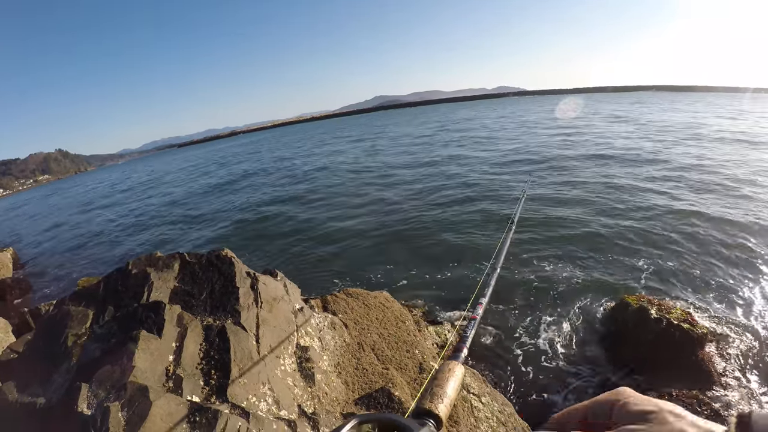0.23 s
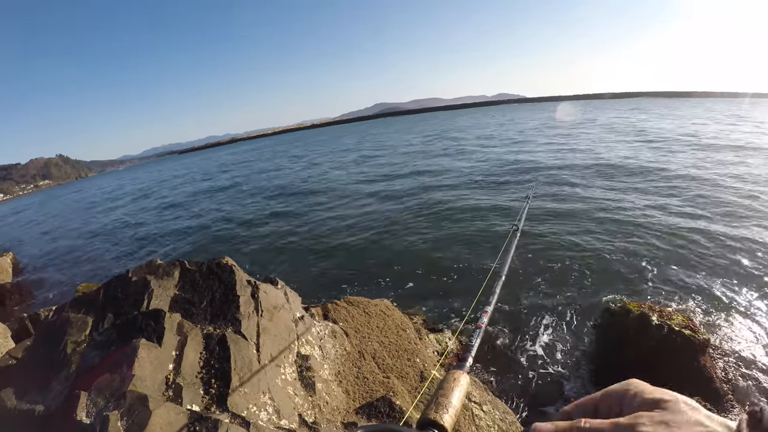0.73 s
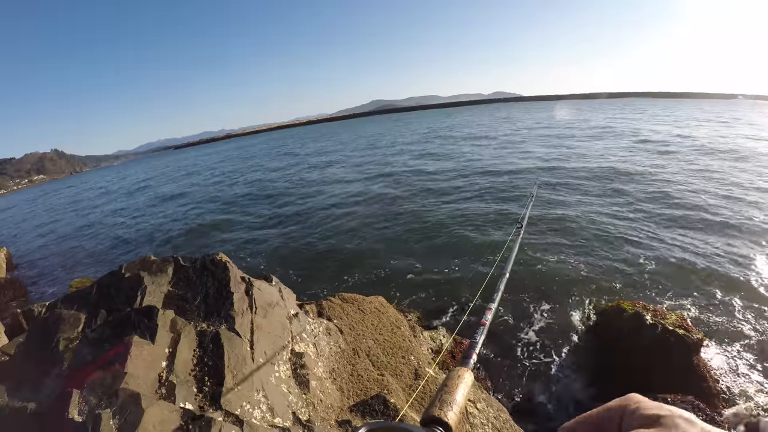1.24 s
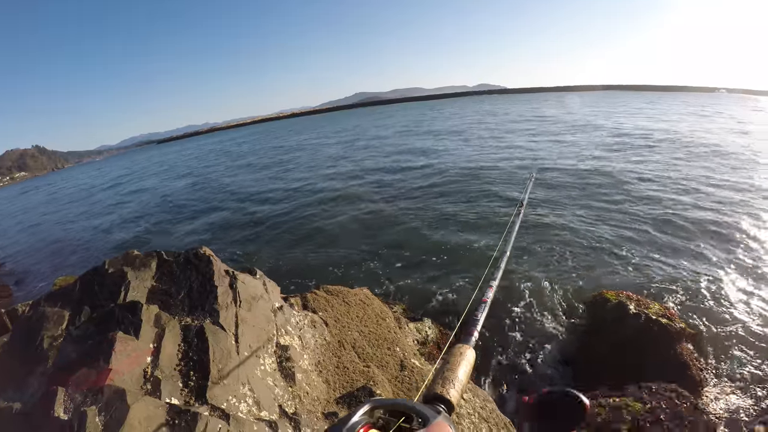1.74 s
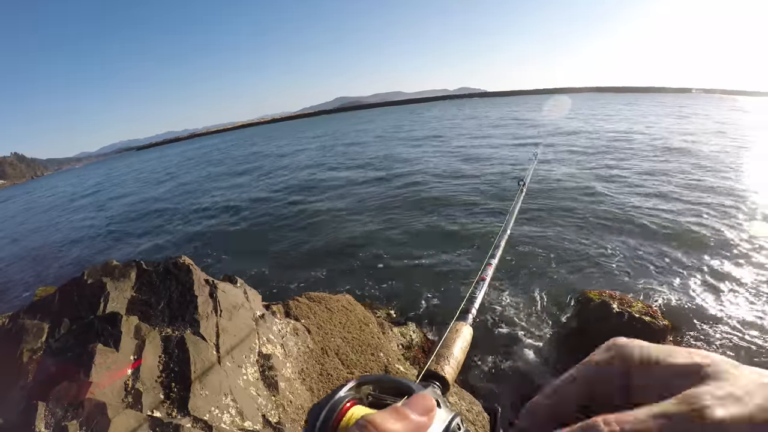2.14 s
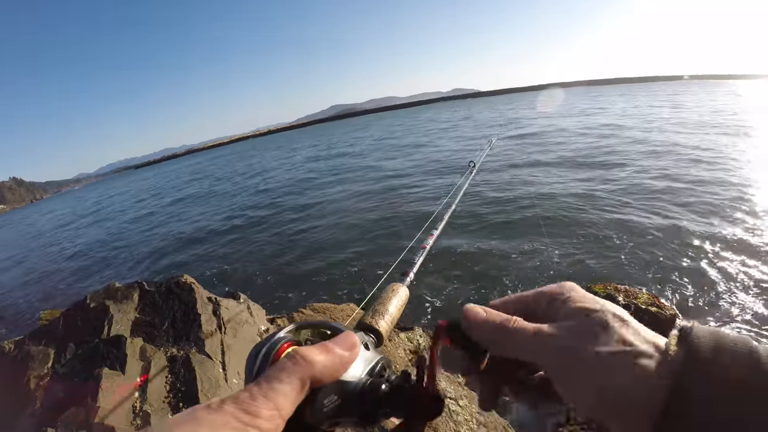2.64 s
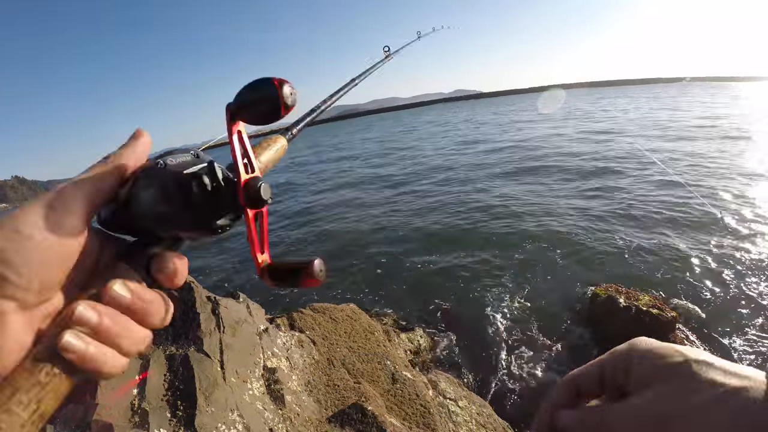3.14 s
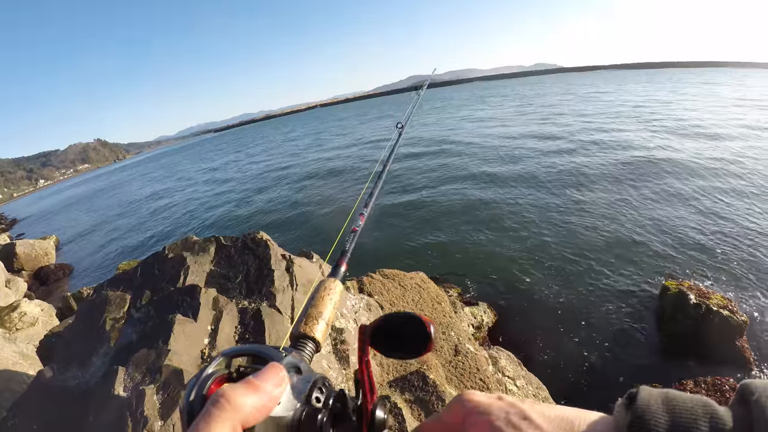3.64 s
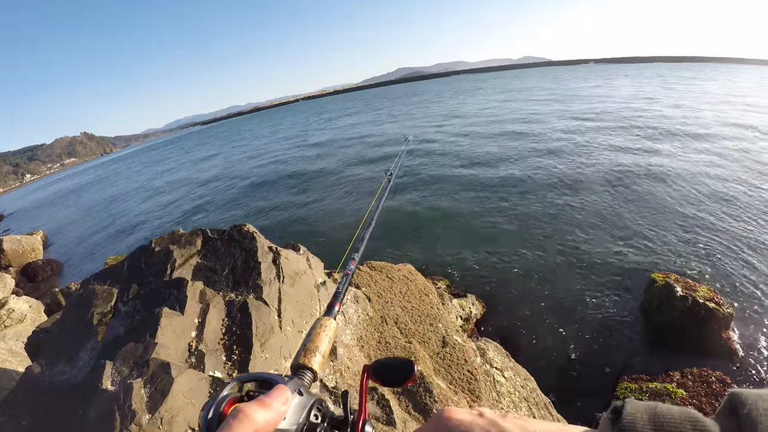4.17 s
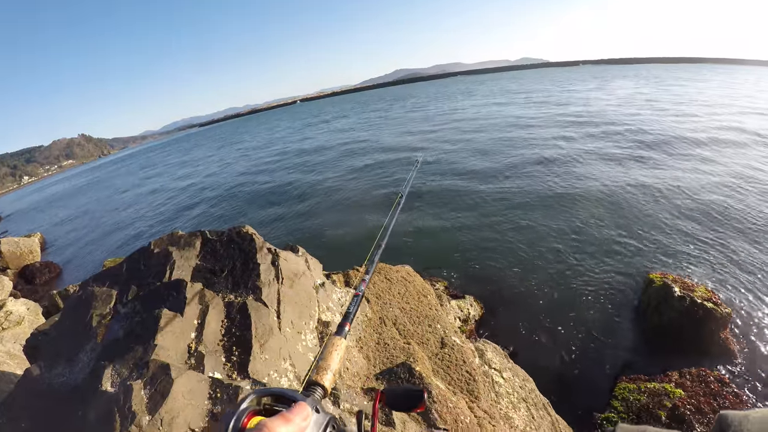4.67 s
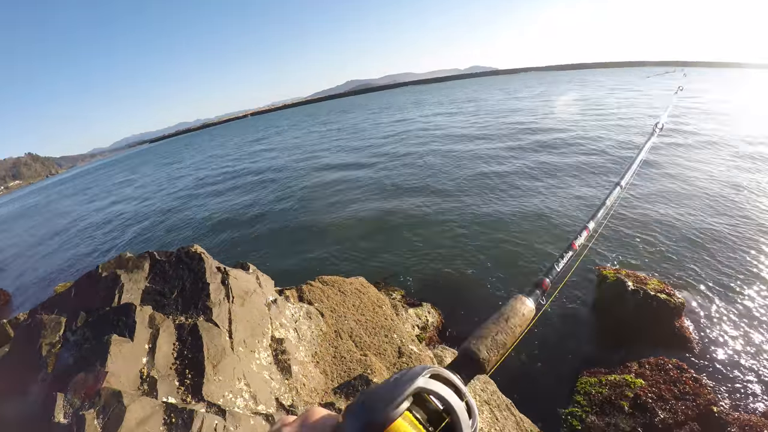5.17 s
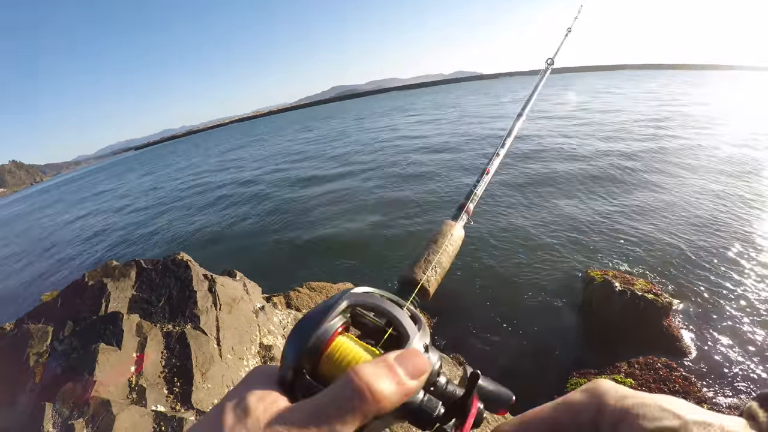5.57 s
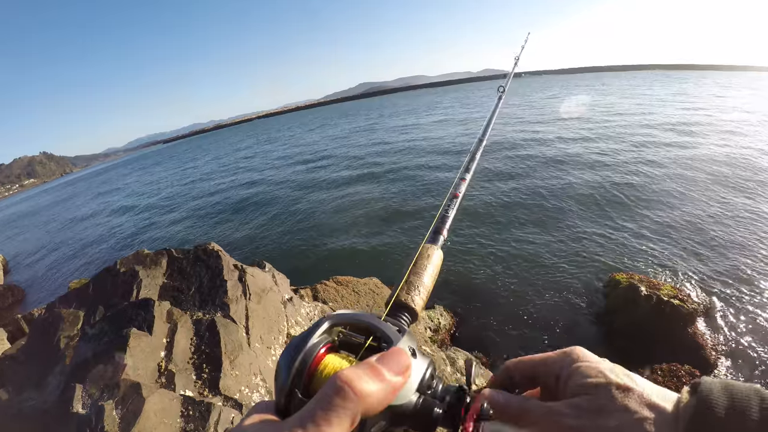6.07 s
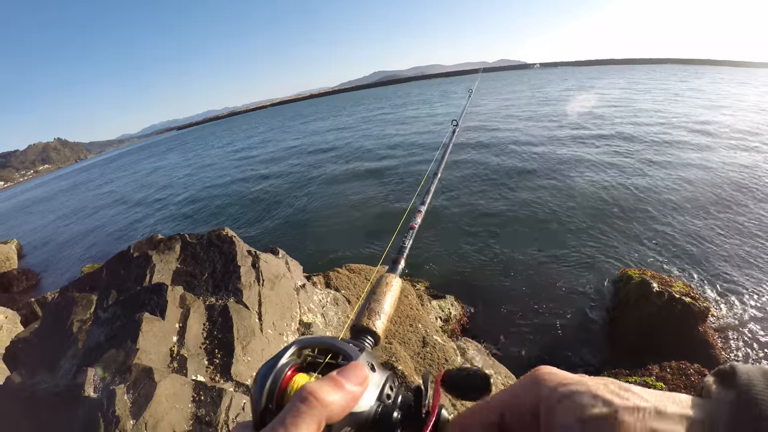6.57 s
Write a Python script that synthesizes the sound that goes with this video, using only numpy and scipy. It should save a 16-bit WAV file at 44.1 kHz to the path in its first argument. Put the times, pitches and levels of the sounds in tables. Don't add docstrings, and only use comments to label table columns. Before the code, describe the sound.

Outdoors on a rocky jetty, small waves surge, slap and fizz close below, with plopping bubbles and hollow knocks in wide stereo. One reel tick comes early. Just after three seconds the sound abruptly drops, quieter, dull and centred. Soft wash continues with faint line and reel ticks, clustered around five seconds; then the width returns as low wind thumps buffet the chest-worn microphone.

```python
import sys
import numpy as np
from scipy import signal
from scipy.fft import rfft, irfft, next_fast_len
from scipy.io import wavfile
from scipy.ndimage import uniform_filter1d, map_coordinates

SR = 44100
rng = np.random.default_rng(int(sys.argv[2]) if len(sys.argv) > 2 else 0)


def elevation(decibels):
    levels = np.asarray(decibels, float)
    return 10 ** (levels / 20)


def put_to_file(sound):
    columns = np.atleast_2d(sound).T
    safe = np.clip(columns, -1, 1)
    whole_steps = np.round(safe * 32767)
    wavfile.write(sys.argv[1], SR, whole_steps.astype(np.int16))


N = 300321
SWITCH_S = 3.262


def evened(x):
    return x / np.sqrt(np.mean(x ** 2) + 1e-20)


def read(points, hz):
    f, *values = np.transpose(points)
    return [np.interp(np.log(hz + 1), np.log(f + 1), v) for v in values]


def curves(rows):
    s, *values = np.transpose(rows)
    return [np.interp(np.arange(N) / SR, s, v) for v in values]


def add(mix, s, sound, pan_db):
    part = mix[:, round(s * SR):][:, :len(sound)]
    part += elevation([[pan_db / 2], [-pan_db / 2]]) * sound[:part.shape[1]]


def band(x, lo_hz, hi_hz):
    return signal.sosfilt(signal.butter(2, [lo_hz, hi_hz], "bandpass", fs=SR, output="sos"), x)


def swells(rows, rise_s):
    t = np.arange(0, N / SR + .01, .002)
    s, _, length_s = np.transpose(rows)[:3, :, None]
    rise = np.exp(-((t - s) / rise_s) ** 2)
    fall = np.exp(-abs(t - s) / np.maximum(length_s, .005))
    return t, np.where(t < s, rise, fall)


# (time [s], share [0-1])
WIDE = [
    (0, 0.92),
    (3.257, 0.9),
    (3.267, 0),
    (5.55, 0.01),
    (6.4, 0.66),
    (6.6, 0.7),
    (6.81, 0.77),
]


def wide_share():
    return np.clip(curves(WIDE)[0], 0, 1)


def foam(patchy_db=1.5, flicker_db=0.74):
    frames = N // 128 + 5
    patches, flicker = rng.standard_normal((frames, 257, 2)).T
    patches = uniform_filter1d(patches, size=6, axis=0)
    patches = evened(uniform_filter1d(patches, size=20, axis=1))
    flicker = uniform_filter1d(flicker, size=60, axis=0)
    flicker = evened(uniform_filter1d(flicker, size=4, axis=1))
    re, im = rng.standard_normal((frames, 257, 2, 2)).T
    z = (re + 1j * im) * elevation(patchy_db * patches + flicker_db * flicker)
    return evened(signal.istft(z, nperseg=512, noverlap=384)[1][:, :N])


def grains(per_cycle=.25, spread_db=3.5, turns=4.8, rise=0.12, count=30):
    out = np.zeros((2, N))
    for hz in np.geomspace(130, 11000, count):
        u = np.arange(int(3 * turns / hz * SR)) / SR * hz / turns
        tone = np.sin(2 * np.pi * turns * (u + rise * u * u / 2))
        ring = tone * np.exp(-2 * u) * (1 - np.exp(-8 * u))
        luck = rng.random((2, N)) / (per_cycle * hz / SR)
        train = (luck < 1) * np.clip(luck, .007, 1) ** (-spread_db * np.log(10) / 20)
        out += signal.oaconvolve(train - train.mean(), ring[None] / np.linalg.norm(ring), axes=1)[:, :N]
    return evened(out)


# (time [s], wash level [dB], foam brightness [dB])
SEA = [
    [(0.0, -29.5, -19), (0.01, -30.5, -15), (0.15, -34.5, -10.5), (0.25, -30.5, -15), (0.99, -35, -10),
     (1.88, -34, -5.5), (2.08, -31.5, -3.5), (3.13, -27, -10.5), (3.26, -29.5, -12.5)],
    [(3.27, -50, -35), (3.27, -48, -12.5), (4.74, -50, -11.5), (4.83, -49, -12.5), (4.88, -50.5, -11.5),
     (5.06, -49.5, -10), (5.66, -46.5, -10.5), (6.5, -47.5, -8.5), (6.81, -41.5, -12.5)],
]
# (share of wash [0-1], share of foam [0-1], share of slap [0-1],
# level on the pair [dB], level on the sheltered port [dB])
LAYERS = [
    (0.68, 0.021, 0.83, -6.5, -5),
    (1.0, 0.11, 0.45, -1.5, 0.5),
    (1.0, 0.98, 0.86, -1.5, -2.5),
    (0.66, 0.43, 0.12, -29.5, -28.5),
]
WAKE_DB = [-2, 0, 0, -17]
# (time [s], lift [dB], length [s], reach into the treble [0-1])
SLAPS = [(0.0, 3, 0.1, 0.6), (0.205, 2, .03, 0.2), (0.257, 5.5, 0.12, 0.43), (0.451, 4.5, 0.047, 0.43),
         (0.538, 8, 0.02, 0.28), (0.79, 3.5, 0.55, 0.11), (6.728, 2.5, 0.065, 0.9), (1.5, 0.5, 0.19, 0.6),
         (1.385, 1, 0.058, 0.9), (2.867, 2, 0.055, 0), (6.454, 0.5, 0.04, 0.2), (6.0, -0.5, .2, 0.3),
         (3.05, 0.5, 0.028, 0.1), (2.797, 1.5, 0.018, 0.65), (6.1, 1, .02, 1), (0.864, 1.5, .05, 0),
         (2.008, 1, 0.052, 0.7), (2.2, 1, 0.026, 1), (2.313, 8.5, 0.015, 0.03), (2.405, 2.5, 0.048, 0.5),
         (2.64, 3.5, 0.33, 0.3), (2.968, 5, 0.023, 0.42), (3.064, 0.5, 0.14, 1), (3.226, 10, 0.027, 0.12),
         (3.258, 1.5, 0.03, 0.46), (3.46, 2.5, 0.076, 1), (3.62, 4, 0.038, 0), (6.34, 1.5, 0.018, 0.8),
         (4.68, 1.5, 0.031, 0), (4.818, 2.5, 0.044, 0.6), (4.97, 6, 0.026, 0.2), (5.09, 4, 0.12, 0.4),
         (5.25, 4, 0.032, 0), (5.36, 0.5, 0.015, 0.3), (5.515, 6, 0.025, 0.2), (5.623, 1, 0.019, 0.4),
         (5.79, -3, 0.039, 0), (5.923, 1.5, 0.039, 0.2)]


def layer_levels(slap_rise_s=0.008, wake_s=0.1):
    wash_db, foam_db = curves(SEA[0] + SEA[1])
    t, shape = swells(SLAPS, slap_rise_s)
    _, lift_db, _, reach = np.transpose(SLAPS)
    now = np.arange(N) / SR
    low_slap_db = np.interp(now, t, lift_db @ shape)
    high_slap_db = np.interp(now, t, (3 * lift_db * reach) @ shape)
    later = now > SWITCH_S
    asleep = later * np.exp(-(abs(now - SWITCH_S) / wake_s / 2) ** 2)
    levels = []
    for k, (wash, fizz, slap, pair_db, one_db) in enumerate(LAYERS):
        slap_db = high_slap_db if k else low_slap_db
        port_db = np.where(later, one_db, pair_db)
        levels.append(wash * wash_db + fizz * foam_db + slap * slap_db + port_db + WAKE_DB[k] * asleep)
    return levels


LAYER_HZ = [550, 2800, 8000]
# (frequency [Hz], density [dB per Hz])
RIGHT = [(150, -4), (210, -3.5), (390, -3.5), (800, -1.5), (1400, -7), (2200, -16.5), (3300, -28.5),
         (4700, -33.5), (6200, -27), (7200, -31), (8200, -36.5), (10000, -41.5), (11500, -48.5),
         (14200, -44.5)]
# (frequency [Hz], left minus right [dB], lag of the left [rad])
PORTS = [(130, -3.5, 0.17), (386, -4.5, 0.37), (560, -10.5, 1.2), (690, -14, 2.8), (770, -12, 4.6),
         (1200, -6, 3.76), (1550, -3.5, 4.5), (1890, -5.5, 4.94), (2250, -2.3, 4.8), (2970, -7, 4.9),
         (4100, -5, 6.8), (5000, -5, 8.2), (6000, -4, 8.0), (7000, -0.2, 8.94), (8200, -1, 9.4),
         (8700, -6.5, 9.5), (9600, 0.5, 9.5)]
# (frequency [Hz], likeness [0-1])
LIKENESS = [(300, .99), (430, .91), (580, .6), (690, .15), (800, .55), (1100, .8), (1450, .9), (2100, .77),
            (2650, .36), (3100, .6), (4100, .68), (4700, .4), (5500, .63), (8000, .52), (9000, .3),
            (11000, .25)]
# (frequency [Hz], density [dB per Hz])
SHELTERED = [(150, 0), (210, -4), (340, -4.5), (550, -15), (900, -22.5), (1100, -27), (2000, -32),
             (3300, -35.5), (4100, -30.5), (4900, -35.5), (5900, -38.5), (7000, -47), (8000, -51),
             (9800, -53), (10800, -56.5), (12000, -63.5), (14500, -69)]
LAG = [1.1, 1.15, 1.3, 0.8]


def water(grain_db=-4.0, bass_cut_hz=150.6):
    size = next_fast_len(N)
    near, spread = rfft(foam() + elevation(grain_db) * grains(), size)
    hz = np.fft.rfftfreq(size, 1 / SR)
    tilt_db, lag = read(PORTS, hz)
    same = read(LIKENESS, hz)[0]
    left = elevation(tilt_db) * (same * np.exp(-1j * lag) * near + np.sqrt(1 - same ** 2) * spread)
    cut = 1 / np.sqrt(1 + (bass_cut_hz / (hz + 1)) ** 22)
    pair = cut * elevation(read(RIGHT, hz)[0]) * np.array([left, near])
    single = cut * elevation(read(SHELTERED, hz)[0]) * near
    above = [1] + [1 / (1 + (edge / (hz + 1)) ** 8) for edge in LAYER_HZ] + [0]
    wide = wide_share()
    out = np.zeros((2, N))
    for k, level_db in enumerate(layer_levels()):
        layer = above[k] - above[k + 1]
        both = irfft(pair * layer, size)[:, :N]
        both /= np.sqrt(np.mean(both.mean(0) ** 2))
        one = evened(irfft(single * layer, size)[:N])
        blend = wide ** LAG[k]
        out += elevation(level_db) * (blend * both + (1 - blend) * one)
    return out


# (time [s], peak level [dB], pitch [Hz])
BUBBLES = [(0.083, -17, 174), (0.204, -16, 325), (0.262, -24, 1080), (0.33, -27, 1170), (0.444, -31, 1840),
           (0.529, -36, 1590), (0.536, -32, 2368), (0.57, -30, 1170), (0.623, -50, 2280), (0.805, -20, 310),
           (0.827, -20, 294), (1.044, -42, 2196), (1.064, -41, 1820), (1.182, -43, 1360),
           (1.383, -41, 2230), (1.395, -37, 2960), (1.278, -36, 1600), (1.48, -38, 3050),
           (1.517, -28.5, 768), (1.563, -34, 2460), (1.612, -24, 940), (1.619, -33, 2190),
           (1.723, -34, 2870), (2.034, -21.5, 1590), (2.223, -30, 964), (2.303, -25.5, 975),
           (2.643, -30, 2420), (2.793, -23, 1830), (2.797, -21, 1030), (2.971, -28, 2400),
           (3.168, -20, 151.4), (3.218, -18, 162),
           (3.412, -45, 620), (3.507, -47, 1330), (3.476, -50, 1850), (3.48, -48, 1480),
                 (3.428, -40, 710), (3.44, -42, 757), (3.455, -43, 643), (3.458, -46, 900),
                 (3.447, -41, 810), (3.53, -47, 1500), (3.598, -46, 1040), (3.472, -55, 2250),
                 (3.575, -47, 1420), (3.634, -44, 1119), (3.815, -49, 1378), (4.785, -49, 1960),
                 (4.802, -43, 880), (4.829, -36, 540), (5.09, -38, 835), (5.36, -49, 1808),
                 (5.511, -44, 1750), (5.644, -37, 743), (5.677, -45, 1690), (5.696, -35.5, 546),
                 (5.707, -41, 1120), (6.519, -43, 650), (5.914, -51, 2239), (5.938, -43, 1250),
                 (6.393, -46, 610), (6.623, -34.5, 595), (6.213, -46, 2100), (6.312, -56, 1290),
                 (6.341, -45, 2050), (6.442, -36, 735), (6.64, -39, 1210), (6.701, -46, 2110),
                 (6.721, -36, 920), (6.759, -39, 1820), (6.765, -28, 900), (6.745, -37, 700),
                 (6.785, -37, 650)]


def bubbles(turns_at_khz=14.6, rise=0.041, wobble=0.23):
    out, rows = np.zeros((2, N)), BUBBLES
    for (s, db, hz), shake in zip(rows, rng.standard_normal((len(rows), 24))):
        turns = turns_at_khz * (hz / 1000) ** 0.5
        u = np.arange(int(3 * turns / hz * SR)) / SR * hz / turns
        shake = wobble * map_coordinates(shake, [u * 7])
        tone = np.sin(2 * np.pi * turns * (u + rise * u * u / 2) + 2 * shake)
        ring = tone * np.exp(-2 * u) * (1 - np.exp(-6 * u))
        add(out, s, elevation(db) * (1 + shake[::-1]) * ring / abs(ring).max(), read(PORTS, hz)[0])
    return band(band(band(out, 122, 9000), 122, 9000), 122, 9000)


# (time [s], peak level [dB], pitch [Hz])
KNOCKS = [(0.03, -23, 149), (0.432, -17, 480), (0.445, -18, 494), (0.462, -18, 466), (0.44, -24, 746),
          (0.936, -18, 170), (0.955, -23, 171), (2.74, -15, 220), (2.815, -16, 302), (2.829, -14.5, 249),
          (2.915, -15, 229), (3.18, -15, 200), (3.135, -15.5, 250), (2.795, -22, 700), (6.518, -35, 600),
          (0.514, -17.5, 251), (0.555, -15.5, 377), (0.775, -18.5, 252), (0.874, -19.5, 221),
          (0.895, -18, 230), (0.913, -16, 190), (1.49, -16, 300), (1.999, -21, 346), (2.188, -19.5, 213),
          (2.404, -16.5, 380), (2.585, -28, 305), (2.7, -19, 199), (2.902, -15.5, 300), (2.943, -11, 303),
          (2.96, -17, 330), (3.037, -13.5, 194), (3.082, -19, 164), (3.123, -13, 393), (3.606, -31, 167),
          (4.136, -29, 162), (4.657, -32, 196), (4.926, -29, 253), (5.059, -31, 213), (5.364, -20.5, 230),
          (5.478, -28, 320), (5.612, -27, 198), (5.787, -28.5, 215), (5.92, -31, 210), (6.143, -25, 347),
          (6.392, -37, 400), (6.535, -33, 194), (6.565, -29, 200), (6.624, -33, 450), (6.644, -27, 300),
          (6.492, -33, 420), (3.232, -16, 376), (2.96, -14, 190), (2.885, -15, 198), (3.205, -16, 420),
          (6.722, -27, 395)]


def knocks(turns=1.46):
    out = np.zeros((2, N))
    for s, db, hz in KNOCKS:
        u = np.arange(int(4 * turns / hz * SR)) / SR * hz / turns
        push = np.sin(2 * np.pi * turns * u) * u * np.exp(1 - 2 * u) * 2
        add(out, s, elevation(db) * push, read(PORTS, hz)[0])
    return band(band(band(out, 137, 9000), 137, 9000), 125, 9000)


# (time [s], peak level [dB], ring [Hz], bright snap [dB])
TICKS = [(1.183, -30, 6840, -1), (3.9958, -47, 4060, -25), (4.082, -45, 4450, -18),
         (4.1145, -43, 4350, -24), (4.3311, -45, 4460, -16), (4.3844, -48, 4610, -15),
         (5.0174, -50, 4140, -12), (5.057, -50, 4270, -18), (5.0754, -37, 4000, -13),
         (5.0865, -33.5, 4050, -20), (5.085, -41, 9400, -20), (5.1905, -41, 1700, -9),
         (5.105, -39, 4060, -14), (5.1225, -36.5, 4900, -20), (5.1405, -39, 3950, -20),
         (5.5, -41, 2930, -20), (5.1225, -44, 3300, -15), (5.1905, -33, 3080, -20),
         (5.1901, -38, 4550, -20), (5.5543, -45, 3550, -14), (5.649, -44, 5000, -14),
         (5.7676, -44, 5040, -14), (5.8351, -40.5, 4150, -16), (5.0838, -41, 7900, -20),
         (6.112, -45, 6060, -9), (6.2378, -40, 6000, -12), (6.2378, -47, 9400, -20),
         (6.244, -55, 9500, -20), (6.5742, -53, 10500, -3), (6.669, -54, 12000, -3),
         (6.383, -57, 11000, -6), (6.3044, -44, 5810, -14), (5.0842, -36, 5000, -20),
         (6.596, -40, 6000, -18), (6.706, -44, 5800, -16), (6.7232, -42, 1300, -16), (3.2, -22, 1700, -19),
         (6, -42, 2000, -20), (5.0568, -43, 1800, -20), (5.112, -44, 2300, -15), (5.677, -45, 3640, -15),
         (5.69, -44, 4300, -15), (5.728, -52, 5000, -15), (6.0155, -44, 3940, -15), (5.5, -46, 4190, -5),
         (6.057, -46, 3330, -15), (6.098, -43, 4500, -8), (6.106, -45, 5500, 0), (6.328, -48, 4270, -15),
         (6.341, -46, 4130, -15), (6.387, -45, 4330, -15), (6.467, -46, 4180, -15), (5.187, -46, 3700, -20),
         (4.6, -41, 2300, -15)]
# (frequency [Hz], level [dB], t60 [s])
FRAME = [
    (4000, -12, 0.034),
    (4900, -22, 0.018),
    (8040, -19, .015),
    (9640, -22, .015),
]


def reel(t60=0.010, bright_t60=0.0055, knock_db=-23.0):
    out, t = np.zeros((2, N)), np.arange(1000) / SR
    for (s, db, hz, bright_db), noise in zip(TICKS, rng.standard_normal((len(TICKS), 1000))):
        width = 0.36 * min(hz, 4500)
        rough = evened(band(band(noise, hz - width, hz + width), 1000, 9700))
        ring = elevation(-60 * t / t60) * (1.1 * np.sin(2 * np.pi * hz * t) + 0.61 * rough)
        frame = np.zeros(len(t))
        if 3500 < hz < 4500:
            for k, (f, level_db, decay_s) in enumerate(FRAME):
                frame += elevation(level_db - 60 * t / decay_s) * np.sin(2 * np.pi * f * t + noise[k])
        snap = elevation(bright_db - 60 * t / bright_t60) * evened(band(band(noise, 4000, 10500), 2000, 10500))
        attack = 1 - np.exp(-t / 0.0002)
        add(out, s, elevation(db) * attack * (ring + snap + frame), read(PORTS, hz)[0] / 3)
    scrape = evened(band(rng.standard_normal(3000), 3640, 4900)) * np.hanning(3000)
    add(out, 5.045, elevation(-50.5) * scrape, 0)
    knock = band(np.sin(np.pi * np.minimum(t / .0013, 1)) ** 2, 130, 6000)
    add(out, 5.1908, -elevation(knock_db) * knock, 0)
    return out


# (time [s], peak level [dB], low edge [Hz], high edge [Hz])
CLICKS = [(5.0572, -46, 800, 5000), (5.0758, -42, 1200, 5500), (5.0848, -36, 2500, 9800),
          (5.1042, -41, 2500, 6000), (5.1232, -40, 3000, 9000), (5.1908, -32, 900, 6000),
          (5.191, -45, 6000, 13000), (5.8352, -42, 1500, 6000), (6.1075, -48, 7500, 13000),
          (6.2385, -42, 4500, 14500), (6.5745, -47, 8000, 13000), (6.6692, -48, 7500, 12500),
          (6.383, -52, 9500, 13000), (1.1835, -38, 5500, 10000), (6.045, -50, 8000, 12000)]


def clicks(t60=.003):
    out, t = np.zeros((2, N)), np.arange(400) / SR
    for (s, db, lo_hz, hi_hz), grit in zip(CLICKS, rng.standard_normal((len(CLICKS), 400))):
        edge = -3.0 * (t == 0) + grit * elevation(-60 * t / t60)
        edge = band(band(edge, lo_hz, hi_hz), lo_hz, hi_hz)
        add(out, s, elevation(db) * edge / abs(edge).max(), 0)
    return out


def bursts(rows, rise_s=0.025):
    t, shape = swells(rows, rise_s)
    return np.interp(np.arange(N) / SR, t, elevation(np.transpose(rows)[1]) @ shape)


# (time [s], peak level [dB], length [s])
THUMPS = [
    (5.9, -65, 0.36),
    (6.19, -31.5, 0.12),
    (6.38, -39, 0.18),
    (6.56, -31, 0.076),
    (6.68, -52, 0.14),
]
# (time [s], peak level [dB], length [s])
RUMBLES = [(0.0, -41, 0.018), (0.3, -65, .04), (0.9, -68, .08), (1.14, -71, 0.071), (1.72, -72, 0.23),
           (2.69, -64, 0.23), (3.09, -67, 0.027), (3.3, -57, 0.23), (3.6, -58, 0.25), (4.12, -64, 0.069),
           (4.4, -62, .05), (4.63, -66, 0.11), (5.5, -66, .2), (6.2, -64, 0.31), (6.73, -49, .07)]


def wind(lump_db=3.5, calm_db=-77):
    lumps = elevation(lump_db * evened(uniform_filter1d(rng.standard_normal((2, N)), size=1200)))
    thumps = band(band(rng.standard_normal((2, N)) * lumps, 140, 193), 135, 420)
    deep = evened(band(rng.standard_normal((2, N)), 8.9, 104))
    deep = deep[0] + 1.3 * wide_share() * np.array([deep[1], -deep[1]])
    return bursts(THUMPS) * evened(thumps) + (elevation(calm_db) + bursts(RUMBLES)) * deep


def scene():
    sea = water() + wind()
    events, hands = bubbles() + knocks(), reel() + clicks()
    size = next_fast_len(N)
    lag = read(PORTS, np.fft.rfftfreq(size, 1 / SR))[1]
    late_left = irfft(rfft(events[0], size) * np.exp(-1j * lag), size)[:N]
    pair = np.array([late_left, events[1]])
    wide = wide_share()
    return sea + wide * (pair + hands) + (1 - wide) * (events + hands).mean(0)


# (frequency [Hz], bar against the local mean [dB])
STARVED = [(6000, -28.5), (7600, -12), (8150, -1), (8500, -5), (9300, 0), (11000, 2.5), (12600, 2),
           (13400, 2.5), (14200, 5), (14400, 25)]
# (frequency [Hz], bar against the local mean [dB])
THINNED = [(11500, -25), (13200, -8), (14300, -4), (15000, -1), (15250, 20)]
# (time [s], share [0-1], extra thinning of the top [dB])
SHORTAGE = [
    (3.25, 1, 0),
    (3.27, 0, 0),
    (5.6, 0, 0),
    (5.8, 0, 7),
    (6.23, 0, 7),
    (6.27, .4, 9),
    (6.81, .5, 9),
]


def starve(x, whim_db=3.0, slip=482):
    padded = np.pad(x, ((0, 0), (slip, 0)))
    hz, t, z = signal.stft(padded, SR, window="cosine", nperseg=2048, noverlap=1024)
    power = (abs(z) ** 2).mean(0) + 1e-20
    mean = uniform_filter1d(uniform_filter1d(power, size=60, axis=0), size=7, axis=1)
    s, share, extra_db = np.transpose(SHORTAGE)
    short = np.interp(t, s, share)
    whim = evened(uniform_filter1d(rng.standard_normal((len(t), 65)), size=2, axis=0)).T
    whim_db = whim_db * np.repeat(whim, 16, axis=0)[:len(hz)]
    sag_hz = np.interp(t, [3.3, 3.55, 4.08, 4.15], [1500, 1300, 900, 0])
    thin_db = read(THINNED, hz[:, None] + sag_hz)[0]
    thin_db = thin_db + np.interp(t, s, extra_db) * (hz > 13000)[:, None]
    spare_db = -8.0 * (t > SWITCH_S + 1) * (hz < 10800)[:, None]
    starved_db = read(STARVED, hz)[0][:, None] + spare_db
    bar = short * elevation(2 * starved_db) + (1 - short) * elevation(2 * thin_db)
    keep = power >= bar * elevation(2 * whim_db) * (hz > 6000)[:, None] * mean
    return signal.istft(z * keep, SR, window="cosine", nperseg=2048, noverlap=1024)[1][:, slip:slip + N]


def top_cut(x):
    return signal.sosfilt(signal.butter(12, 15230, fs=SR, output="sos"), x)


def record(dry):
    t = np.arange(N) / SR
    shut = 1.2 * (t > SWITCH_S) * np.clip(1 - (abs(t - SWITCH_S) / 0.9) ** 1.3, 0, 1)
    top = signal.oaconvolve(dry, signal.firwin(61, 13000, pass_zero=False, fs=SR)[None], "same")
    hiss = evened(band(band(rng.standard_normal((2, N)), 11600, 15300), 11000, 15300))
    hiss = elevation(-76.0) * np.clip((t - 3.9) / 0.32, 0, 1) * hiss
    mix = starve(dry - shut * top + hiss)
    return top_cut(mix)


dry = scene()
out = record(dry)
put_to_file(out)
```